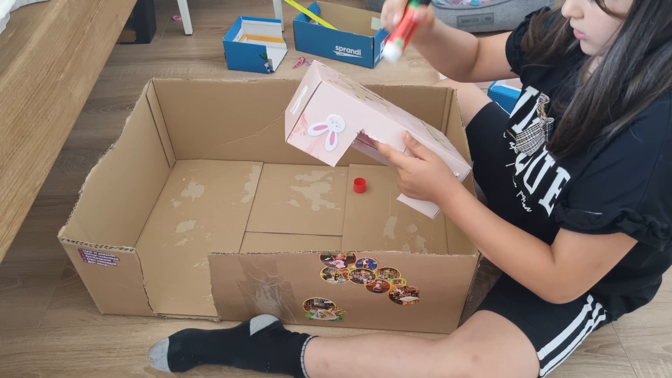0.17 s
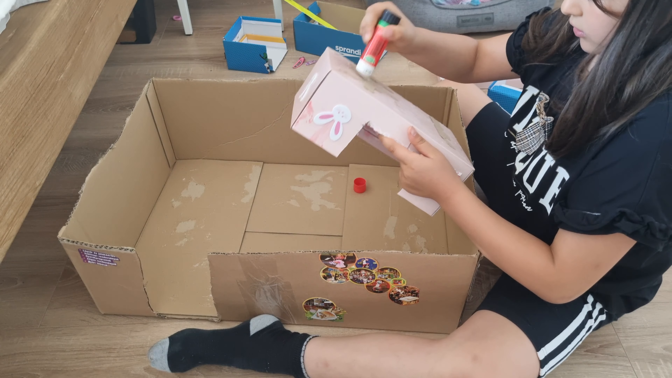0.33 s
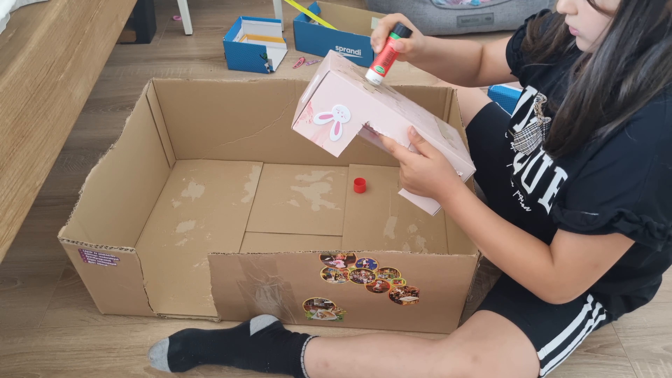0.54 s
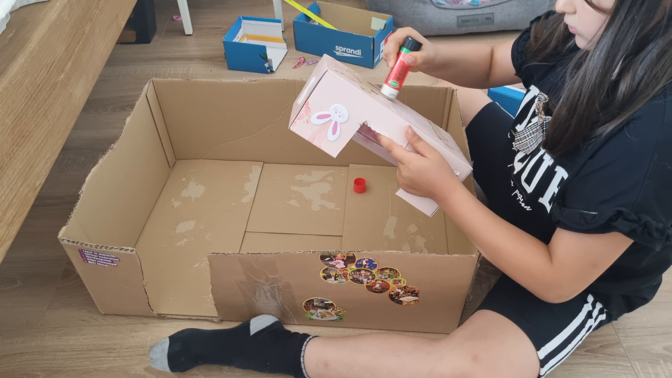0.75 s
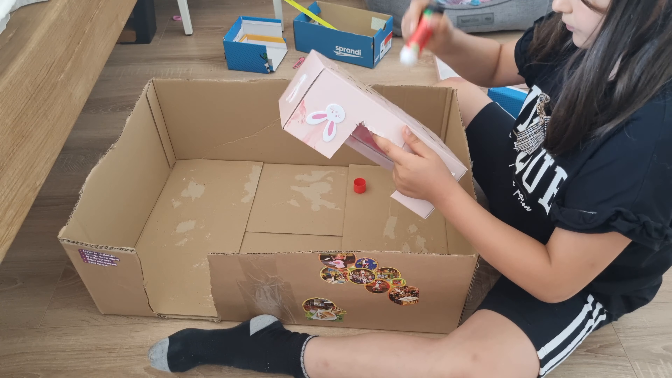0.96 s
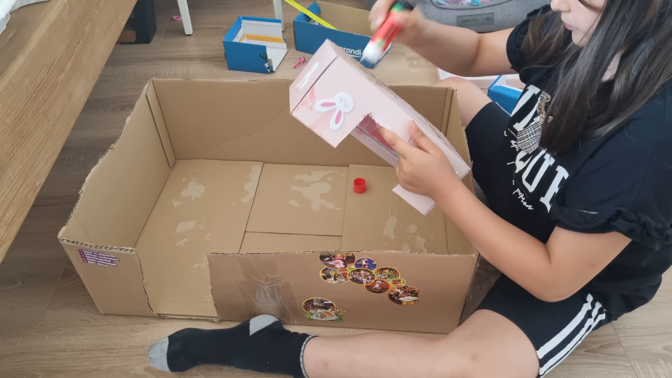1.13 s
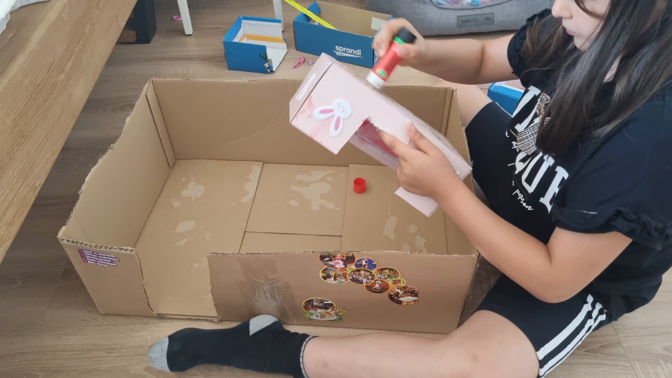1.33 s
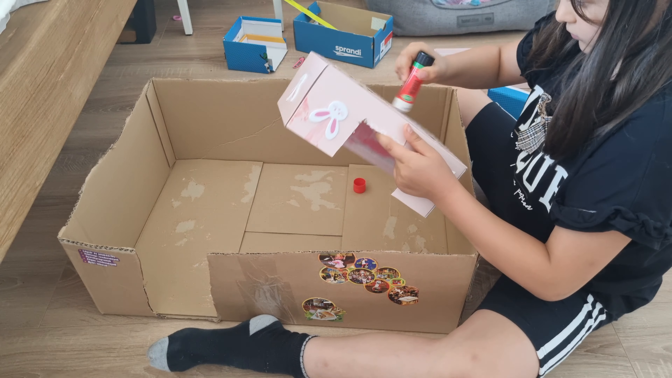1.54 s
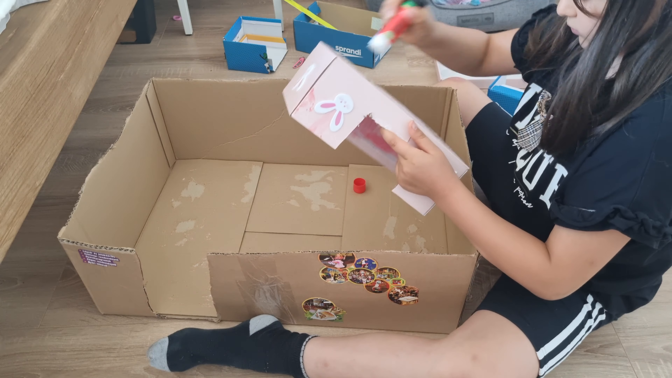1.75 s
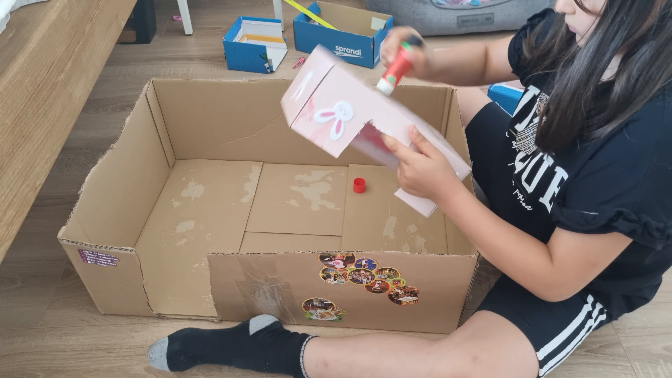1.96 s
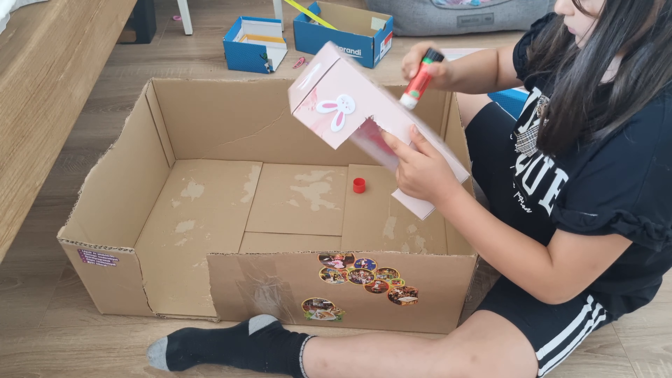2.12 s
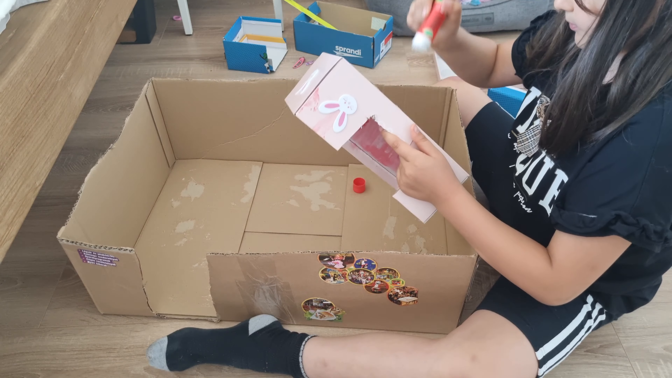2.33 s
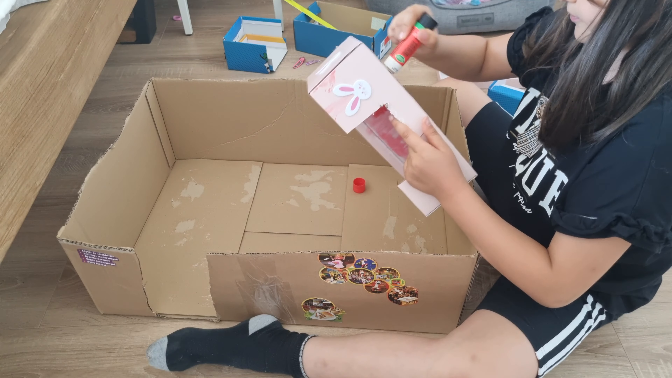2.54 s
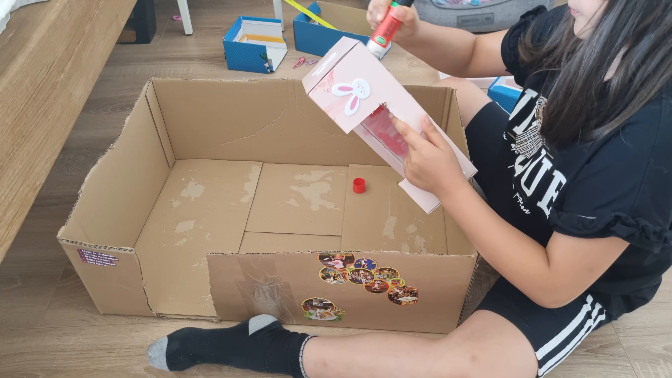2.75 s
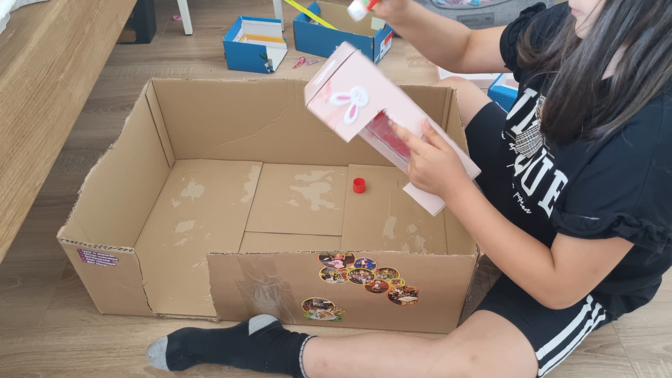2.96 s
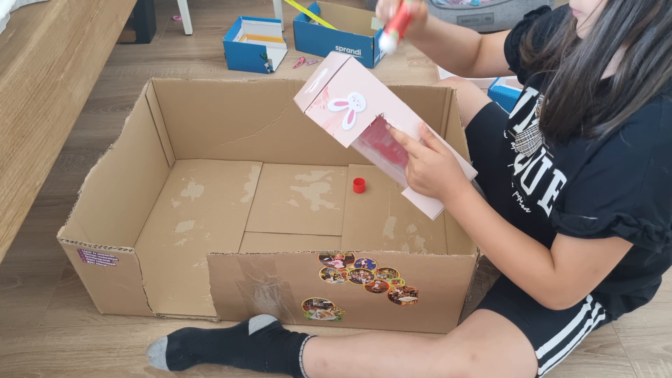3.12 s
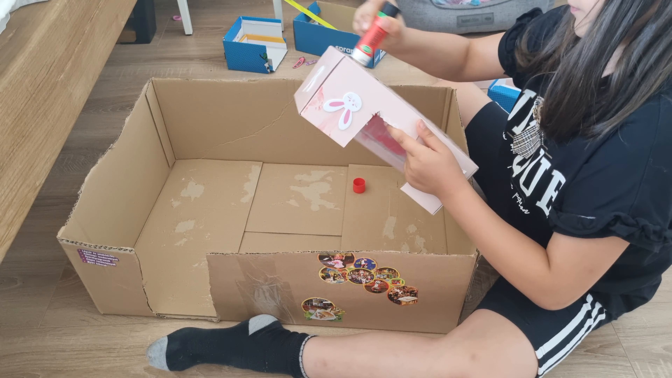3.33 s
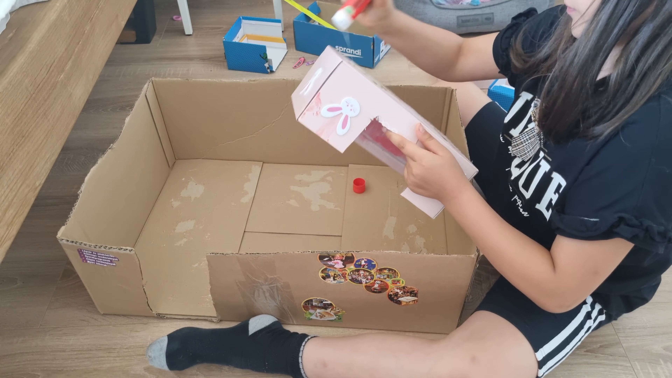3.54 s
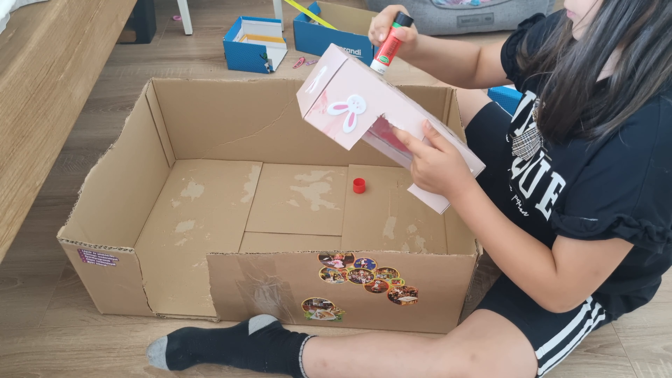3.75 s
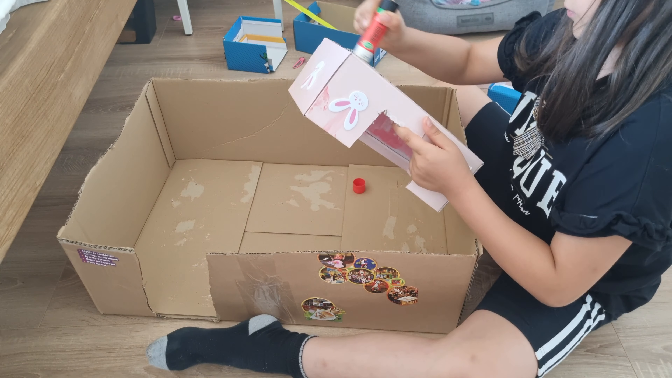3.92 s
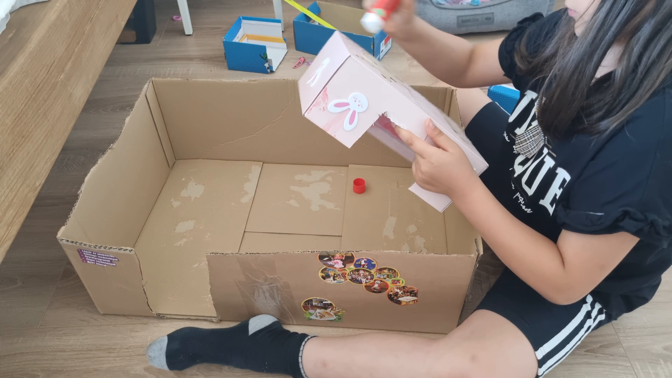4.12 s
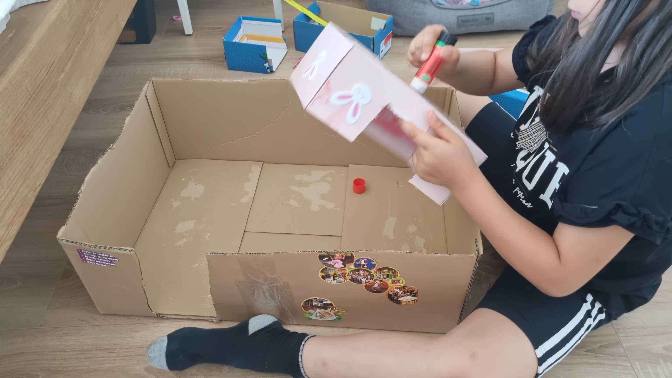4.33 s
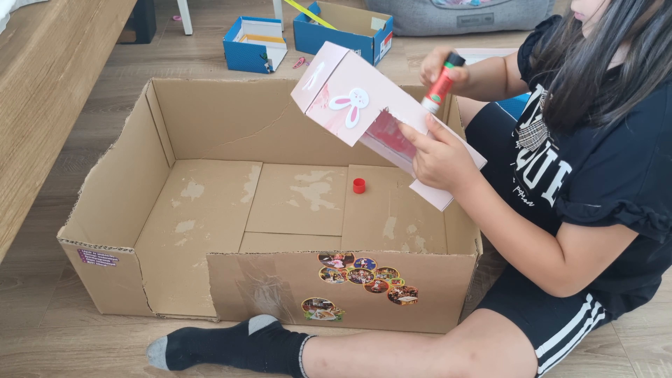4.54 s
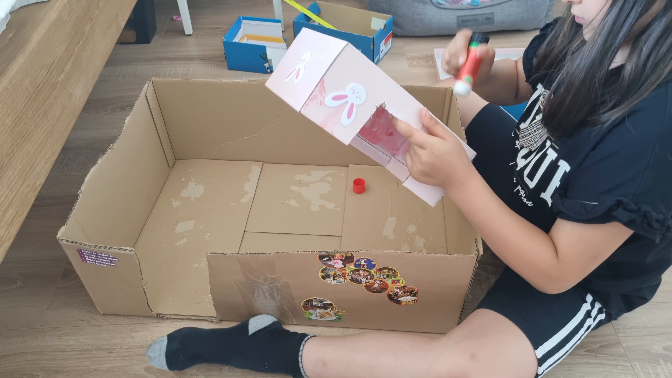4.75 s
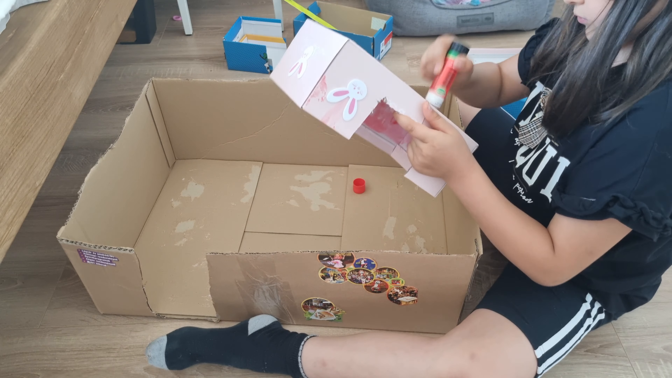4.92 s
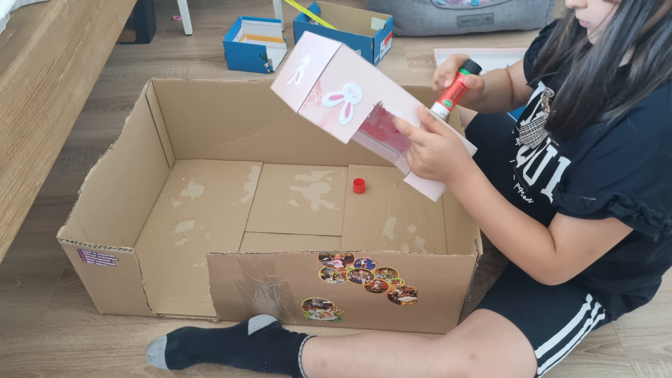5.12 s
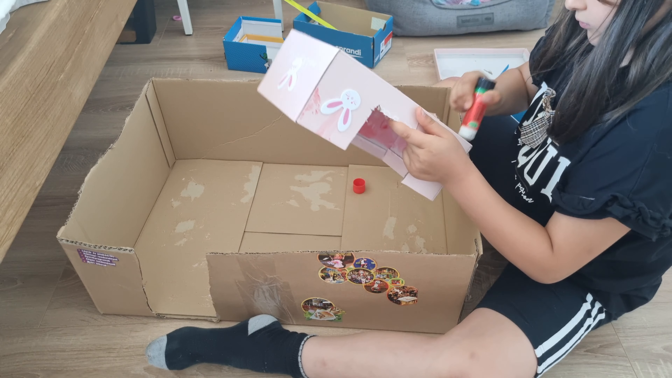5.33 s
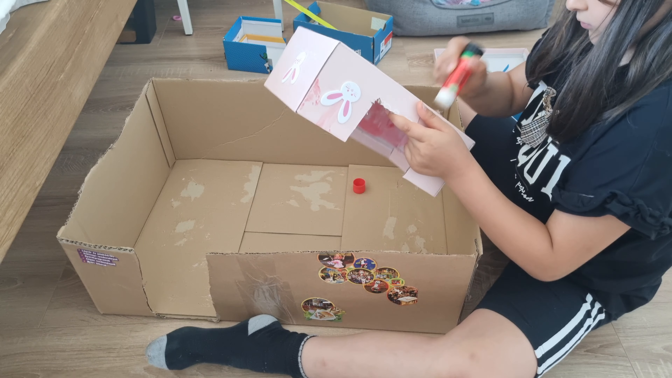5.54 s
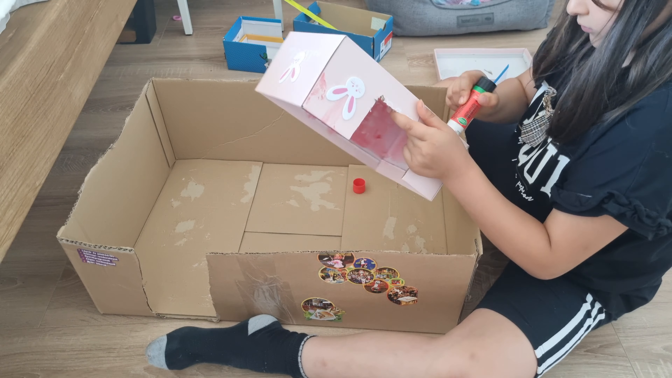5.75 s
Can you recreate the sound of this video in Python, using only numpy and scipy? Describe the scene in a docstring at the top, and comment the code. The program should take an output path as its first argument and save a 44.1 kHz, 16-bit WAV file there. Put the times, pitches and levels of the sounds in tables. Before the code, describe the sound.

A quiet, fairly bare room with low rumble, a faint hum and thin hiss, heard in stereo. The tail of a rubbing stroke opens the scene, then a soft hollow dab at 0.4 s and a light drag from 0.65 to 0.95. A firmer boxy knock at 1.2 leads to a sticky snap, a brief peeling crackle and a rub around 1.35 to 1.55. The hardest, crunchiest dab falls at 1.85, with a strong juddering scrape until 2.1. Soft bumps follow at 2.6 and 3.0, the latter with a small tacky snap. Crisp hollow knocks at 3.25 and 3.75 are each followed by a short drag. At 4.35 a dab makes the wide wall boom deep and drumlike. A short rub follows at 4.6, a dull double thud at 5.0, a sticky peel at 5.2, and a tiny hard tick at 5.3. Closing dabs and a quick scrape cluster around 5.6 to 5.75.

```python
"""A glue stick is dabbed on a small hollow cardboard box held in one hand, in a quiet, fairly bare room.
Dabs are filtered blows that set sine modes of the box's air and board ringing; some boom its wide wall.
Drags are swelling noise of stick-slip clicks; peels are noise bursts that fade into a sticky crackle.
A hard rim ticks once. Two microphones hear it in stereo, with a diffuse room tail on the contact sounds,
over low rumble, a faint hum and thin hiss."""
import sys
import numpy as np
from scipy import signal
from scipy.fft import rfft, irfft
from scipy.io import wavfile

SR = 44100
rng = np.random.default_rng(int(sys.argv[2]) if len(sys.argv) > 2 else 0)


def persist_wave(psi):
    """Save psi, clipped to +-1, as 16-bit WAV."""
    counts = np.round(np.clip(psi, -1, 1) * 32767).astype(np.int16)
    wavfile.write(sys.argv[1], SR, np.atleast_2d(counts).T)


N = 259308

# Rumble spectrum of the still room: (frequency [Hz], relative level [dB])
RUMBLE_SPECTRUM = [(12, -41.5), (28, -37.5), (40, -5.5), (52, -1), (64, 5), (85, -11.5), (130, -13.5),
                   (240, -14.5), (400, -34), (800, -36), (1600, -42.5), (4000, -45), (11000, -45.5),
                   (16000, -34)]
# Likeness of the room's sound at the two microphones: (frequency [Hz], correlation [-1 to 1])
MICROPHONE_LIKENESS = [(60, 0.91), (150, 0.82), (280, 0.91), (500, .55), (1000, 0.33), (2000, -0.0096),
                       (4000, 0), (12000, -0.12)]
# Reverberation time of the room: (frequency [Hz], time to fall 60 dB [s])
ROOM_T60 = [(150, 0.49), (400, 0.52), (1000, 0.59), (2500, 0.51), (6000, 0.66), (14000, 0.16)]
# Blows on the middle of the wide wall that make it boom: (time [s], level [dB])
BOOMS = [(4.360, 9.5), (4.642, -12)]
# Resonances of the wide wall: (frequency [Hz], relative level [dB], time to fall 60 dB [s])
WALL_MODES = [(187.4, 2.5, 0.4), (239, 3.5, 0.14), (230.9, 2, 0.35), (245, 4, 0.29), (304.5, -1, 0.13),
              (351, -20.5, 0.42)]
# The stick's hard rim on an edge of the card: (time [s], level [dB])
RIM_CLICKS = [(5.3163, -23.5)]
# Spectrum of the rim click: (frequency [Hz], relative level [dB])
RIM_SPECTRUM = [(400, -15), (1150, 5), (1600, 2.5), (2200, -6), (2900, 2), (4200, -11), (6000, -14),
                (9000, -30)]
# Tacky glue letting go: (time [s], snap level [dB], length of the peel that follows [s])
SNAPS = [(1.333, -41, .01), (1.354, -28.5, 0.18), (2.972, -29.5, 0.0088), (4.611, -61, .01),
         (4.6366, -34, 0.037), (5.193, -27.5, 0.12), (5.691, -34.5, 0.013), (5.753, -46, .01)]
# High, crackly spectrum of the peels, the drag crackle and the fizz: (frequency [Hz], relative level [dB])
CRACKLE_SPECTRUM = [(1000, -23), (3500, -2.5), (6500, -2.5), (8300, 3), (10500, -3.5), (13000, 4),
                    (15500, -1)]
# Spectrum of scraped paper and flicked card: (frequency [Hz], relative level [dB])
SCRAPE_SPECTRUM = [(300, -23), (900, 7.5), (1600, -7), (2900, 3.5), (4200, -11.5), (6500, -13.5),
                   (10000, -25), (16000, -26.5)]
# The stick dragged over the card: (start [s], end [s], pressure [dB]); a negative start is already under way
DRAGS = [(-.06, 0.044, -0.5), (0.638, 0.965, -5), (1.334, 1.563, 4.5), (1.89, 2.129, 9),
         (2.835, 2.994, -11), (3.34, 3.506, -2), (3.918, 4.096, 2.5), (4.562, 4.693, 3.5),
         (5.113, 5.299, -0.5), (5.646, 5.763, 5.5)]
# Spectrum of the juddering board: (frequency [Hz], relative level [dB])
JUDDER_SPECTRUM = [(50, -8), (130, 12), (260, -1), (500, -10), (750, -9.5), (1100, -13), (1600, -20),
                   (2500, -20.5), (5000, -61.5)]
# Dabs and softer bumps: (time [s], strength [dB], contact cut-off [Hz], hollowness [dB]);
# a high cut-off is a hard touch; hollowness raises or lowers the low ring of the enclosed air
TAPS = [(0.3912, -5.5, 786, 2), (0.863, -21.5, 496, -7), (0.891, -30, 1440, 2.5), (1.2085, 2.5, 1900, -1),
        (1.451, -23, 1280, -9), (1.534, -25, 1120, 4), (1.8553, 9, 2990, -2.5), (1.982, -7, 420, -6),
        (2.075, -22.5, 1100, -1), (2.225, -26.5, 844, 1), (2.573, -13.5, 702, 9), (2.973, -22, 1060, -2),
        (3.2342, 5.5, 2370, 0), (3.457, -28.5, 916, -0.5), (3.7633, 2.5, 2340, .5), (4.360, -0.5, 2060, -1),
        (4.637, -20.5, 1170, 6), (4.98, 0, 1010, 1), (5.010, -8.5, 890, -27), (5.2352, -7.5, 1300, -4),
        (5.602, -2.5, 1280, 3), (5.654, -12.5, 1030, 0.5), (5.714, -27, 760, 9.5)]
# Resonances of the enclosed air: (frequency [Hz], relative level [dB], time to fall 60 dB [s])
AIR_MODES = [(106.2, 1, 0.17), (112.8, -12, 1), (131.3, 12, 0.25), (153.6, 8.5, 0.11)]
# Resonances of the board: (frequency [Hz], relative level [dB], time to fall 60 dB [s])
BOARD_MODES = [(190, -4, 0.43), (253.7, -4, 0.77), (260.2, -3.5, 0.49), (291.9, 1.5, 0.2),
               (308.7, -2.5, 0.44), (354.3, 4.5, 0.47), (384.4, 2, 0.37), (420.3, -3, 0.31),
               (459.4, 2, 0.29), (448, -6, 0.58), (480.4, -2, 0.099), (518.3, 0, 0.29), (545, 5.5, 0.13),
               (567, -14, 0.17), (697, -10, 0.26), (625, -14, 1), (665.3, 8.5, 0.27), (699, 8, 0.12),
               (730, -17, 0.11), (740, -12, 0.2), (795, -1, 0.28), (805.5, -2, 0.46), (970, -10.5, 0.24),
               (978, -11.5, 0.53), (1067, -13, 0.58), (1083, -5.5, 0.23), (1089, -9.5, 0.64),
               (1128, -13, 0.57), (1230, -31.5, 0.28)]
# Spectrum of the dry knock on the board: (frequency [Hz], relative level [dB])
KNOCK_SPECTRUM = [(60, -23), (130, -11), (260, 2), (400, -0.5), (530, 2), (740, 2), (900, -11), (1080, -1),
                  (1250, -14), (1480, -7), (1800, -16.5), (2600, -11.5), (3600, -36.5), (7000, -19.5)]
# Spectrum of crunching paper: (frequency [Hz], relative level [dB])
CRUNCH_SPECTRUM = [(700, -15), (1500, 12), (2600, -4), (3400, 4), (4800, -3.5), (6500, -18.5),
                   (9000, -25.5), (16000, -29.5)]

RUMBLE_DB, HUM_DB, HUM_HZ = -59.5, -70, 57.6
RECORDER_TOP_HZ = 15800
# card flick and peeling crackle, relative to the snap
FLICK_DB, PEEL_DB = -1, -35.5
# levels at pressure 0; judder follows pressure fully, the surface noises by SURFACE_SLOPE dB per dB
JUDDER_DB, SCRAPE_DB, CRACKLE_DB, SURFACE_SLOPE = -55.5, -73.5, -74, 0.6
# enclosed air and paper respond less than in proportion to the blow: dB at strength 0, dB per dB
AIR_DB, AIR_SLOPE = 1.5, 0.83
CRUNCH_DB, CRUNCH_SLOPE = -28, 0.5
# touches harder than this contact cut-off crunch more
CRUNCH_DB_PER_OCTAVE, SOFT_TOUCH_HZ = 6.5, 1030
# the light paper skin follows a blow this many times higher than the board
CRUNCH_REACH = 1.62


def undb(db):
    """Decibels to gain."""
    return 10 ** (np.asarray(db) / 20)


def unit(x):
    """Scale to a mean energy of one per channel."""
    energy = np.sum(x ** 2, axis=-1)
    return x / np.sqrt(np.mean(energy))


def along(points, hz):
    """Read (frequency, value) points on a log-frequency axis."""
    f, value = np.transpose(points)
    return np.interp(np.log(hz + 1e-3), np.log(f), value)


def add(track, s, x):
    """Mix x into the track from time s, trimming what falls outside."""
    start = int(s * SR)
    first = max(start, 0)
    x = x[max(-start, 0):N - first]
    track[first:first + len(x)] += x


def through(x, response):
    """Play x through an impulse response."""
    return signal.fftconvolve(np.atleast_2d(x), np.atleast_2d(response), axes=-1)[:, :N]


def colour(points, size=2048):
    """Minimum-phase impulse response with the given spectrum, so no sound precedes the touch."""
    level_db = along(points, np.fft.rfftfreq(size, 1 / SR))
    cepstrum = irfft(np.log(undb(level_db)))
    # fold the cepstrum forward in time to make the response causal
    cepstrum[1:size // 2] *= 2
    cepstrum[size // 2 + 1:] = 0
    return unit(irfft(np.exp(rfft(cepstrum))))


def diffuse(size):
    """Spectra of diffuse noise at two microphones: alike in the bass, unrelated in the treble."""
    hz = np.fft.rfftfreq(size, 1 / SR)
    mid, side = np.exp(2j * np.pi * rng.random((2, len(hz))))
    alike = np.clip(along(MICROPHONE_LIKENESS, hz), -0.99, 0.99)
    opposite = np.array([[1], [-1]])
    return hz, mid * np.sqrt(1 + alike) + side * np.sqrt(1 - alike) * opposite


def ring(modes, build_s, stagger, spacing_s):
    """Decaying sines that build up as the sound spreads, each from its own side of the microphones."""
    t = np.arange(SR) / SR
    waves = 0
    for k, (hz, db, t60) in enumerate(modes):
        lag = rng.choice([-1, 1]) * spacing_s * np.array([[1], [-1]])
        cycles = hz * (t + lag) - k * stagger  # each mode a little behind the last
        waves = waves + undb(db - 60 * t / t60) * np.sin(2 * np.pi * cycles)
    return unit(waves * (1 - np.exp(-t / build_s)))


def burst(decay_s):
    """A scatter of tiny contacts, made of noise that swells at once and dies away."""
    t = np.arange(SR // 10) / SR
    swell = 1 - np.exp(-t / 0.00062)
    return unit(rng.standard_normal(len(t)) * np.exp(-t / decay_s) * swell)


def slips(per_s, spread_db):
    """Dense stick-slip clicks of very unequal size, rms one."""
    chance, size, sign = rng.random(N), rng.exponential(size=N), rng.choice([-1, 1], N)
    clicks = (chance < per_s / SR) * sign * undb(spread_db * np.minimum(size, 5))
    return np.sqrt(N) * unit(clicks)


def cushioned(x, contact_hz, order=4):
    """Soft glue cushions a blow and takes its treble away."""
    return signal.sosfilt(signal.butter(N=order, Wn=contact_hz, fs=SR, output="sos"), x)


def background(shelf_hz=12200, shelf_db=-83):
    """Low room rumble and hum, with a thin microphone hiss at the very top."""
    hz, field = diffuse(N)
    rumble = undb(RUMBLE_DB) * unit(irfft(field * undb(along(RUMBLE_SPECTRUM, hz)), N))
    _, hiss_field = diffuse(N)
    shelf = 1 + np.tanh((hz - shelf_hz) / 400)
    hiss = undb(shelf_db) * unit(irfft(hiss_field * shelf, N))
    hum = undb(HUM_DB) * unit(np.sin(2 * np.pi * HUM_HZ * np.arange(N) / SR))
    return np.sqrt(N) * (rumble + hiss + hum)  # from unit energy to unit rms


def room(x, direct_db=-3, gap_s=0.0036, early_db=-1, early_s=0.14):
    """Direct sound, then a diffuse tail whose first reflections, off floor and furniture, are strongest."""
    t = np.arange(SR) / SR
    hz, field = diffuse(SR)
    centres = np.log([f for f, _ in ROOM_T60])
    tail = 0
    # each row of the identity picks one overlapping band with its own decay
    for share, (_, t60) in zip(np.eye(len(centres)), ROOM_T60):
        band = irfft(field * np.interp(np.log(hz + 1), centres, share), SR)
        tail = tail + band * undb(-60 * t / t60)
    onset = 1 - np.exp(-(t / gap_s) ** 2)
    early = 1 + undb(early_db) * np.exp(-(t / early_s) ** 4)
    response = unit(tail * onset * early)
    response[:, 0] += undb(direct_db)
    return through(x, unit(response))


def booms():
    """The wide wall flexes like a drumhead: each blow sets its modes ringing."""
    blows = np.zeros(N)
    for s, db in BOOMS:
        add(blows, s, undb([db]))
    return through(blows, ring(WALL_MODES, build_s=0.00067, stagger=0.27, spacing_s=0.0001))


def rim_clicks():
    """Hard plastic meets the card: a short dry tick without a thump."""
    clicks = np.zeros(N)
    for s, db in RIM_CLICKS:
        add(clicks, s, undb(db) * burst(decay_s=0.0021))
    return through(clicks, colour(RIM_SPECTRUM))


def snaps():
    """Threads of glue break in a quick burst, the card springs back and the rest peels in a fading crackle."""
    snap, flick, peel = np.zeros((3, N))
    for s, db, peel_s in SNAPS:
        add(snap, s, undb(db) * burst(decay_s=0.036))
        add(flick, s, undb(db + FLICK_DB) * burst(decay_s=0.0033))
        fade = np.cos(np.linspace(0, np.pi / 2, max(int(peel_s * SR), 2)))
        add(peel, s, undb(db + PEEL_DB) * fade)
    crackle = peel * slips(per_s=1700, spread_db=3.5)
    return through(flick, colour(SCRAPE_SPECTRUM)) + through(snap + crackle, colour(CRACKLE_SPECTRUM))


def drags():
    """Each stroke swells and eases: with pressure the board judders, its paper scrapes and the glue crackles."""
    pressed, surface = np.zeros((2, N))
    for start, end, pressure_db in DRAGS:
        speed = np.sin(np.linspace(0, np.pi, max(int((end - start) * SR), 2)))
        add(pressed, start, undb(pressure_db) * speed)
        add(surface, start, undb(SURFACE_SLOPE * pressure_db) * speed)
    judder = through(pressed * slips(per_s=830, spread_db=4.0), colour(JUDDER_SPECTRUM))
    scrape = through(surface * slips(per_s=600, spread_db=6), colour(SCRAPE_SPECTRUM))
    crackle = through(surface * slips(per_s=2800, spread_db=1.5), colour(CRACKLE_SPECTRUM))
    return undb(JUDDER_DB) * judder + undb(SCRAPE_DB) * scrape + undb(CRACKLE_DB) * crackle


def taps(knock_db=-2.5, ring_db=-2, rattle_db=-5, fizz_db=-42.5, fizz_slope=0.4):
    """Dabs on the box: returns the dry knock and crunch with a faint high fizz, and the ring of air and board."""
    knock, board, air, crunch, fizz = np.zeros((5, N))
    push = signal.unit_impulse(SR // 10)
    for s, db, contact_hz, hollow_db in TAPS:
        blow = unit(push + undb(rattle_db) * burst(decay_s=0.0023))
        add(knock, s, undb(db) * cushioned(blow, contact_hz))
        add(board, s, undb(db) * cushioned(push, contact_hz))
        add(air, s, undb([AIR_DB + AIR_SLOPE * db + hollow_db]))
        # the paper gives
        hardness_octaves = np.log2(contact_hz / SOFT_TOUCH_HZ)
        crunch_db = CRUNCH_DB + CRUNCH_SLOPE * db + CRUNCH_DB_PER_OCTAVE * hardness_octaves
        paper = cushioned(burst(decay_s=0.0051), CRUNCH_REACH * contact_hz, order=2)
        add(crunch, s, undb(crunch_db) * paper)
        # a faint high fizz with each dab
        add(fizz, s, undb(fizz_db + fizz_slope * db) * burst(decay_s=0.025))
    air_ring = ring(AIR_MODES, build_s=0.0026, stagger=0.43, spacing_s=0.00018)
    board_ring = ring(BOARD_MODES, build_s=0.00066, stagger=0.2683, spacing_s=0.00014)
    rings = through(air, air_ring) + undb(ring_db) * through(board, board_ring)
    contact = undb(knock_db) * through(knock, colour(KNOCK_SPECTRUM))
    contact += through(crunch, colour(CRUNCH_SPECTRUM))
    contact += through(fizz, colour(CRACKLE_SPECTRUM))
    return contact, rings


def scene():
    """Contact sounds heard across the room, with the ringing of the box and the background added."""
    contact, rings = taps()
    touches = contact + drags() + snaps() + rim_clicks()
    return room(touches) + rings + booms() + background()


def record(dry):
    """The recorder cuts the top with a steep low-pass."""
    low_pass = signal.ellip(10, 0.2, 80, RECORDER_TOP_HZ, fs=SR, output="sos")
    return signal.sosfilt(low_pass, dry)


dry = scene()
out = record(dry)
persist_wave(out)
```